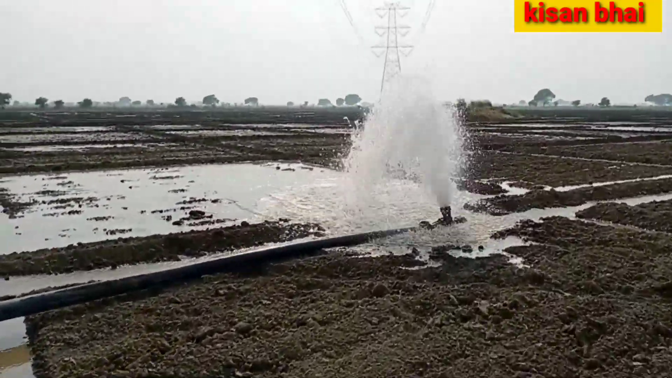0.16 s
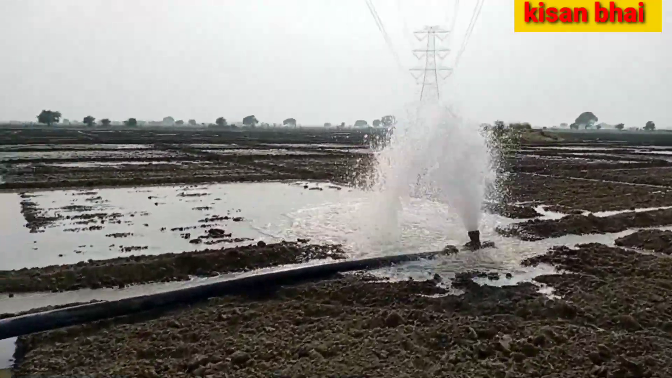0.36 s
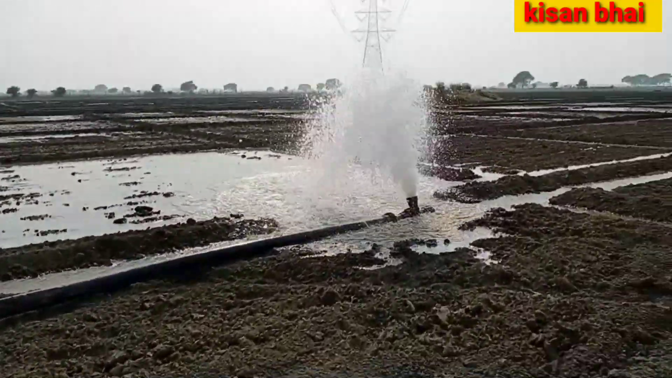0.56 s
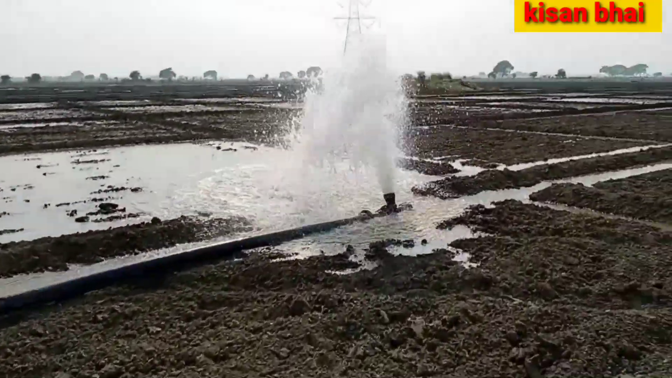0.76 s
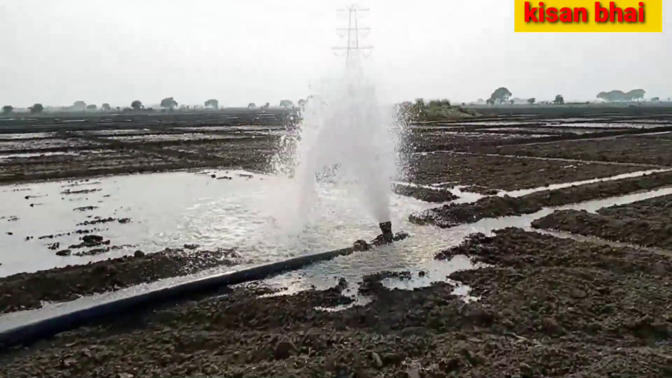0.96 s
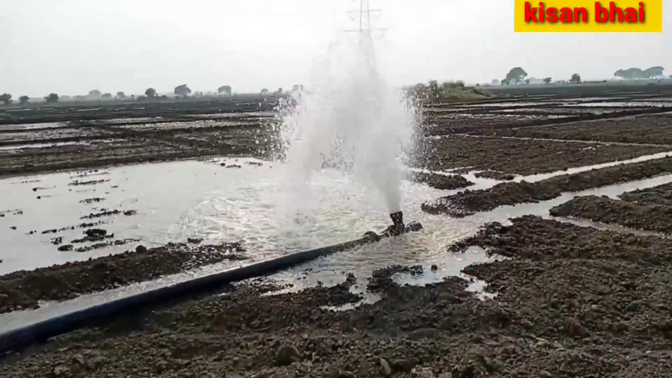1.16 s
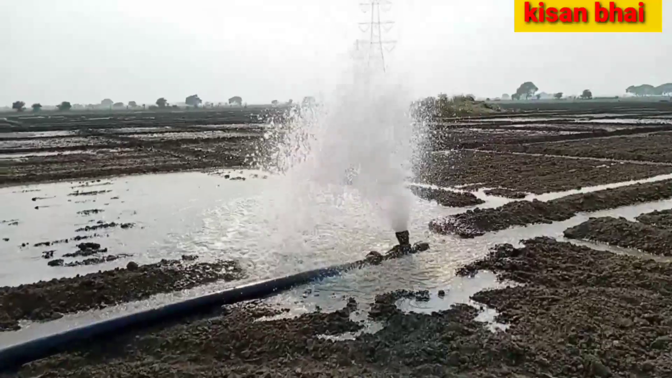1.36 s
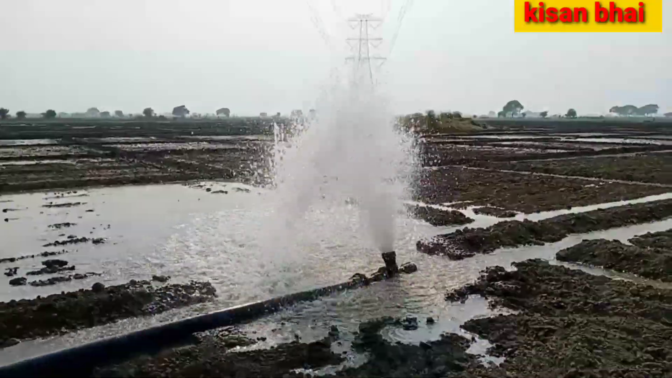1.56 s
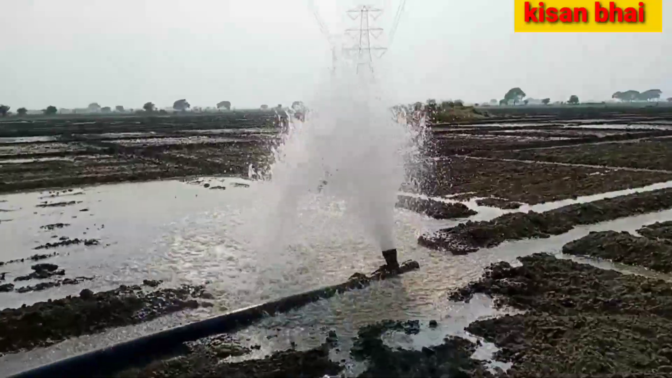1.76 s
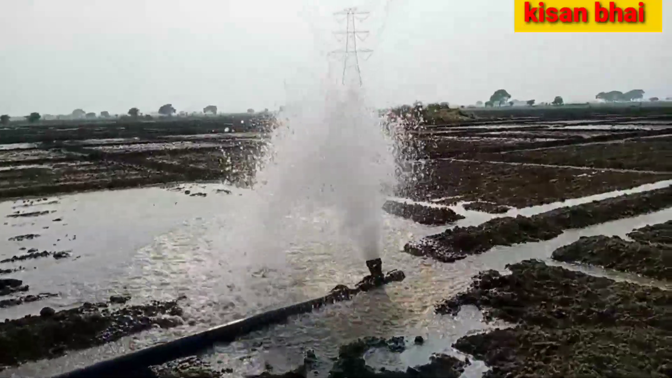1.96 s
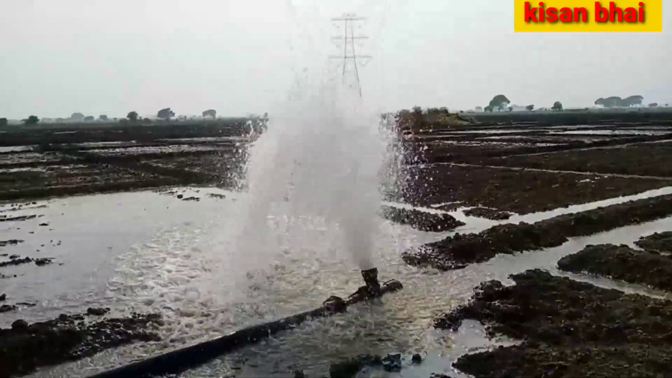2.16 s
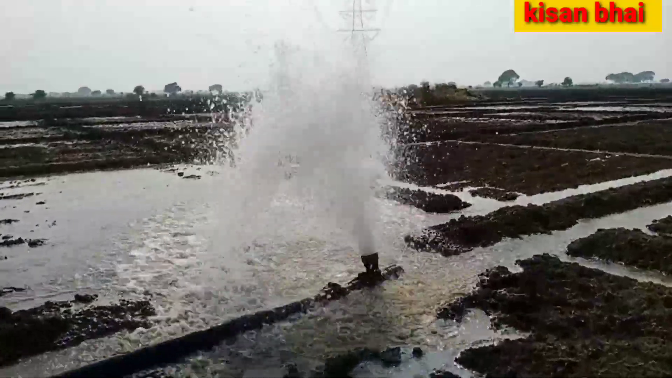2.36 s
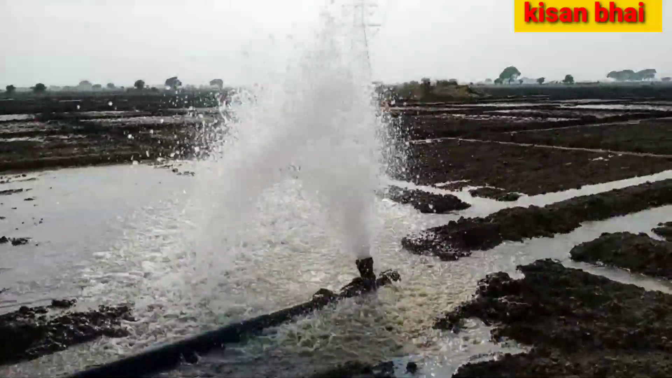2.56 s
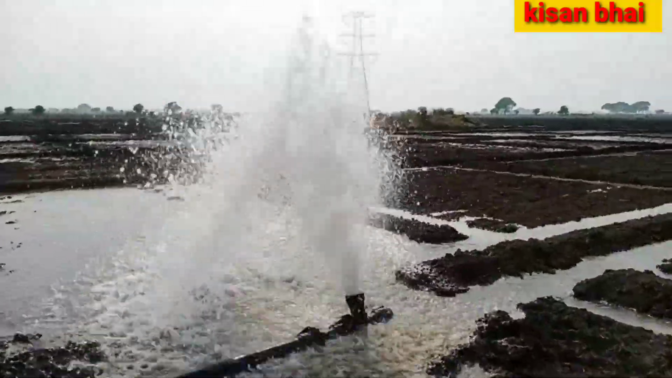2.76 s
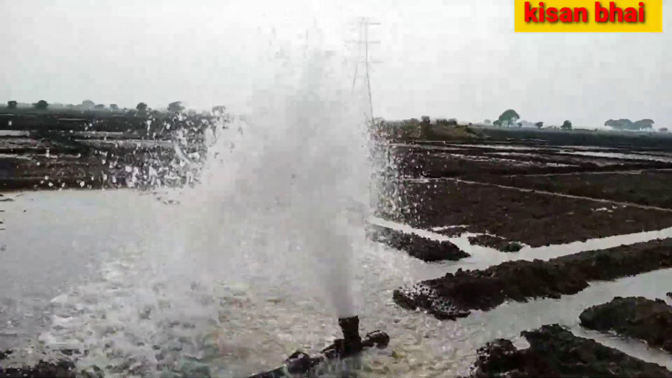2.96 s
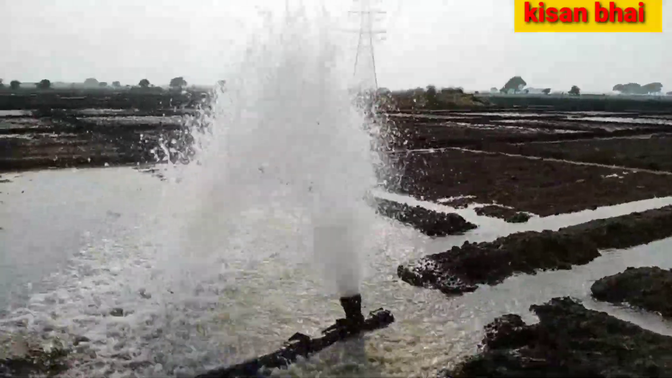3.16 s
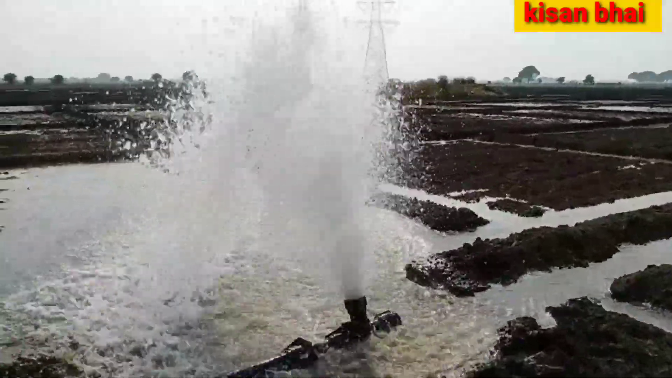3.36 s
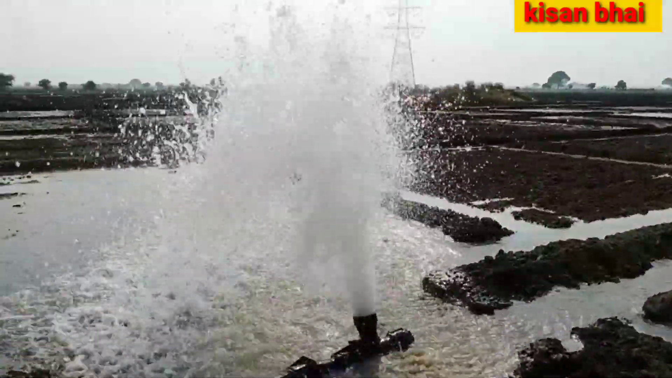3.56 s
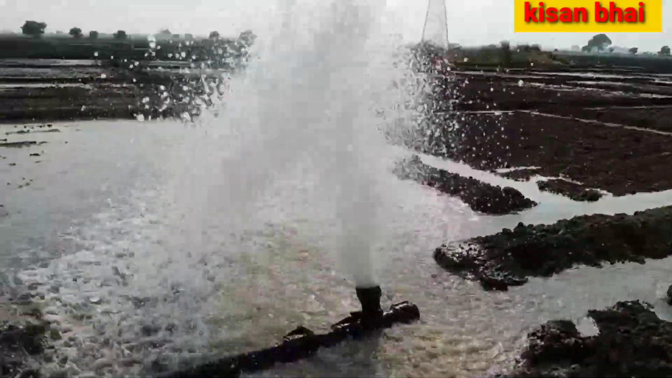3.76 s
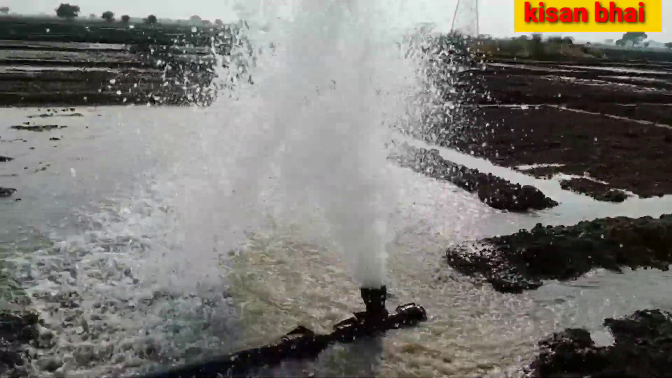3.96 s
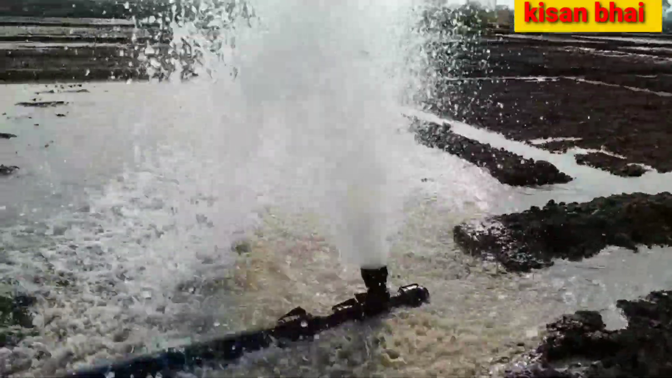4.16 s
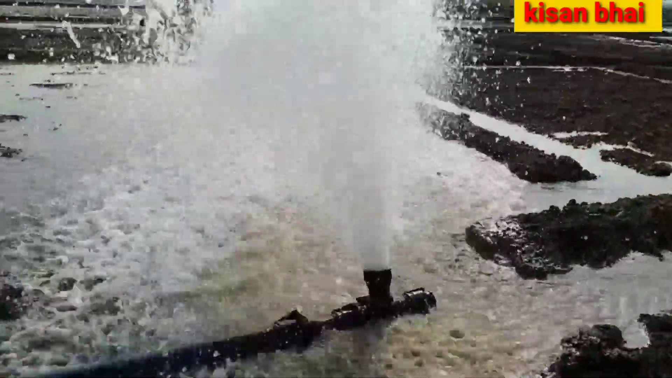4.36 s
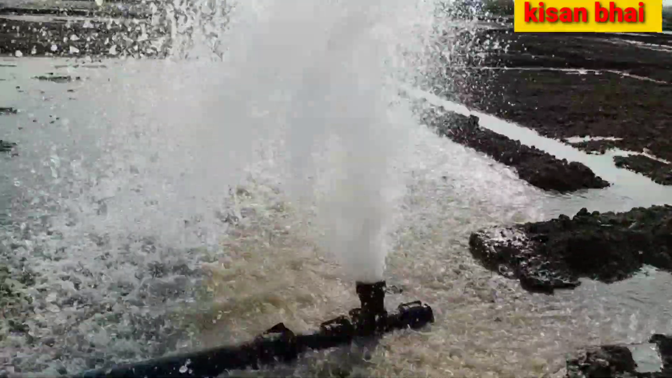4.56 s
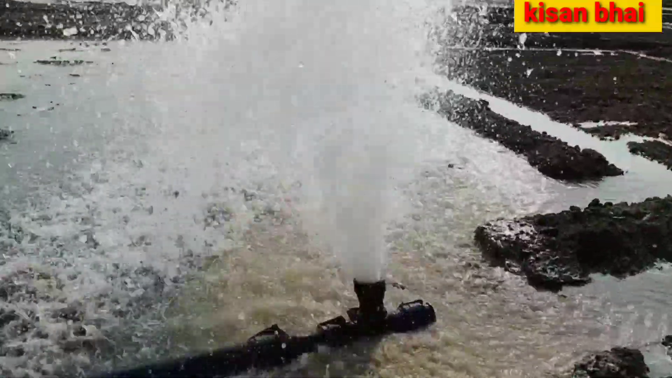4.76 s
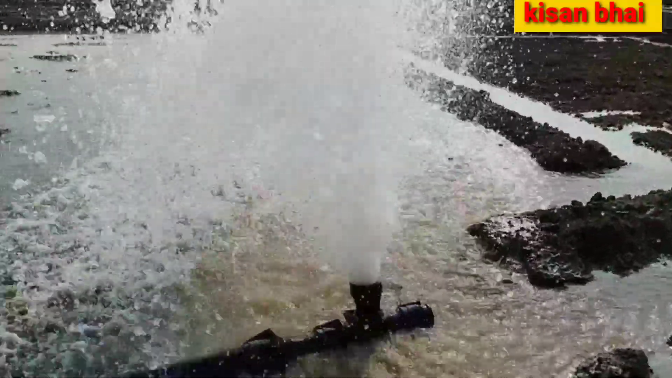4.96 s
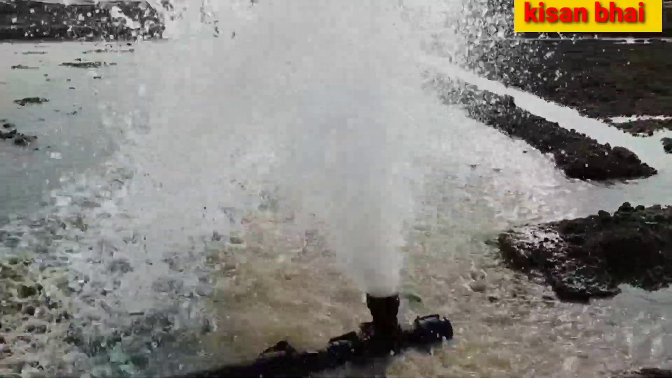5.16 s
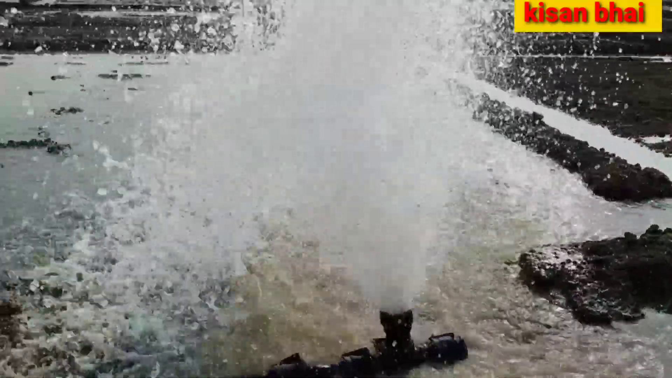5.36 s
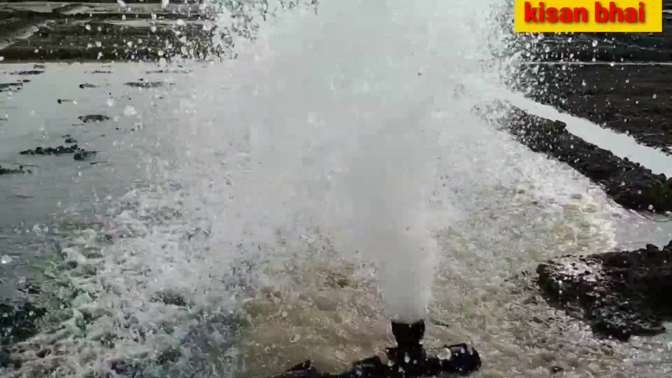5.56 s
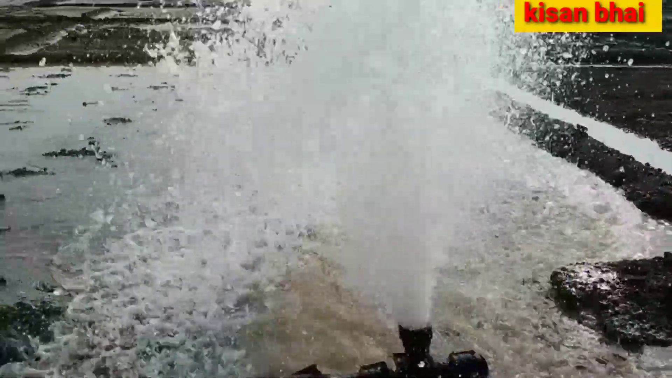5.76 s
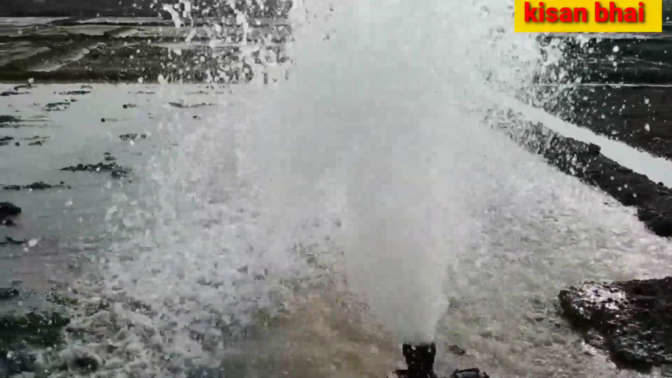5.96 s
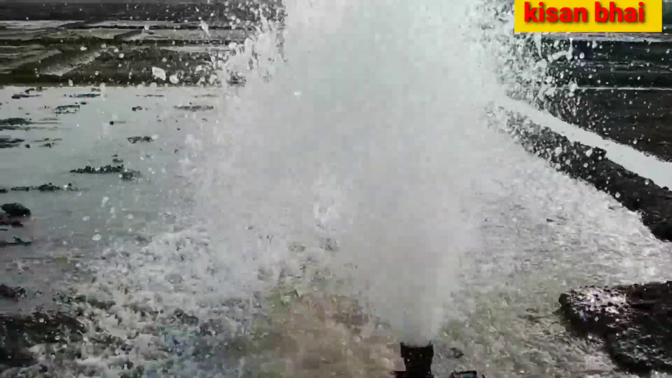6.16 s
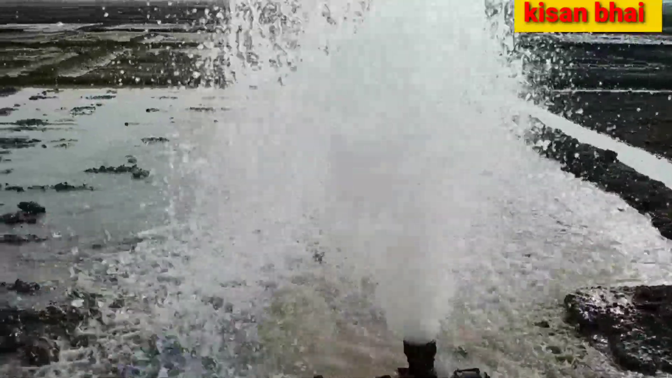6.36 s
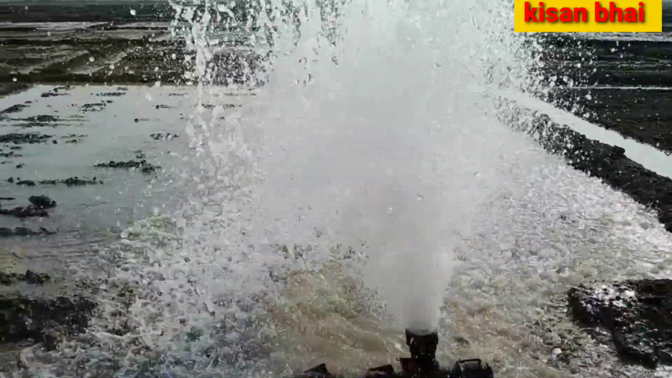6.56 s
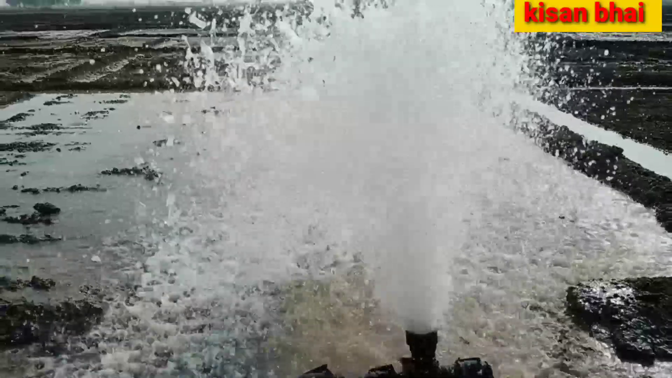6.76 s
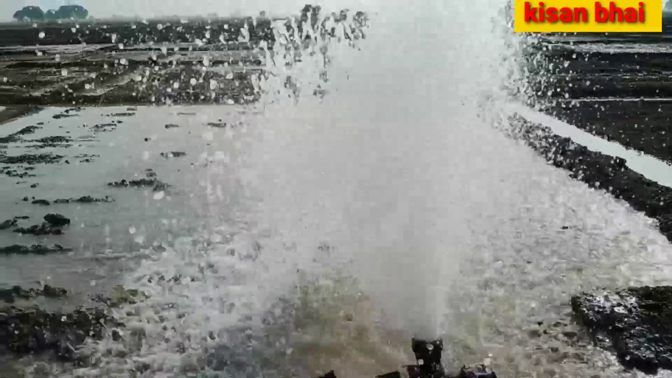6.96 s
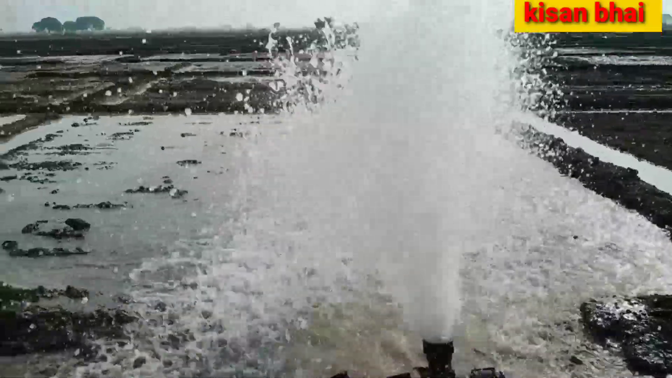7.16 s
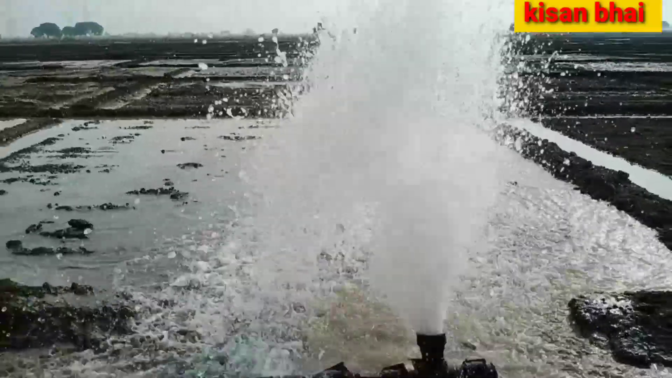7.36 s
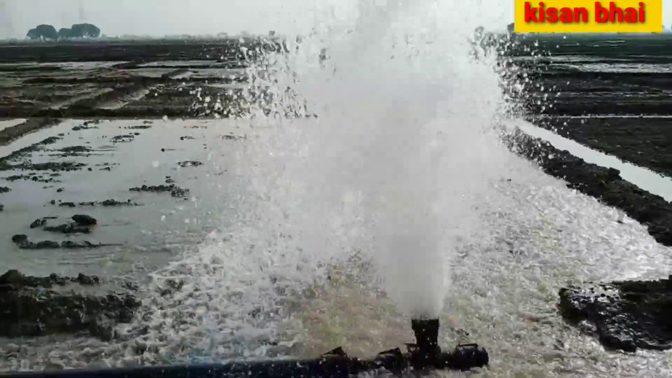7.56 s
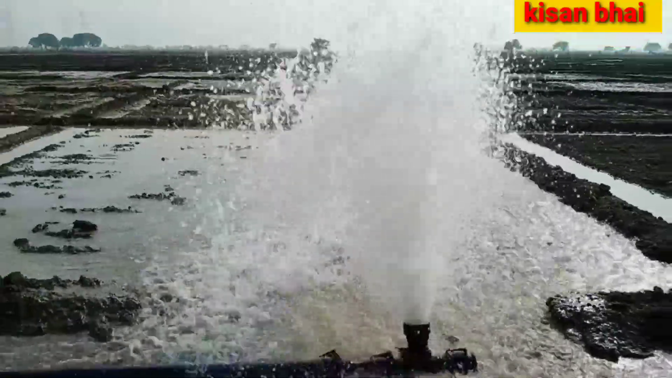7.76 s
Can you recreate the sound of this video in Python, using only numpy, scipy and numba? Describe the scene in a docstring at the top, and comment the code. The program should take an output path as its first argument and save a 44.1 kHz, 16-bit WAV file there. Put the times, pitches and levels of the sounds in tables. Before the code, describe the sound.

A water jet crashes hissing into a flooded field, growing closer, while wind thuds and flutters hard against the phone microphone.

```python
"""Water fizzes and plops: a jet from an irrigation pipe falls into a flooded field as a phone comes nearer.
The splash is hiss plus countless ringing bubbles, and its colour shifts on the way in.
Wind thuds and flutters on the microphone: filtered noise plus short single swings for buffets, soft and hard.
A faint steady rumble lies below, and the phone's limiter pushes the spray down under strong gusts."""
import sys
import numpy as np
from scipy import signal
from scipy.fft import rfft, irfft
from scipy.io import wavfile
from scipy.ndimage import uniform_filter1d, map_coordinates
from numba import njit

SR = 44100
rng = np.random.default_rng(int(sys.argv[2]) if len(sys.argv) > 2 else 0)


def inscribe(sig):
    """Save sig as 16-bit PCM at rate SR to the path in sys.argv[1].

    A 1-D sig is mono; a 2-D sig holds one channel per row.
    Samples are clipped to [-1, 1] before scaling.
    """
    pcm = np.round(np.clip(np.atleast_2d(sig).T, -1, 1) * 32767)
    wavfile.write(sys.argv[1], SR, pcm.astype(np.int16))


N = 343980  # length in samples
HZ = np.maximum(np.arange(N // 2 + 1) * SR / N, 1)  # every frequency in the spectrum

# the walk towards the jet: start_s, nearness (0 far, 1 halfway, 2 nearby, 3 close),
# spray_level_db (before the limiter), mist_lift_db (extra level of the fine mist, full above 8.5 kHz)
APPROACH = [(0, 0.12, -23.5, 1.1), (1.0, 0.075, -22, 2.5), (1.27, 0.22, -23, 1.5), (1.34, 0.2, -19.5, 2.3),
            (1.95, 0.26, -19, 1.6), (2.05, 0.42, -17.5, 1.2), (3, 1.18, -17, 2.1), (3.6, 1.4, -16.5, 2.4),
            (4.3, 2.23, -17, 3.1), (4.6, 2.26, -16, 3), (5, 2.34, -16, 1.9), (5.4, 2.58, -15, 2),
            (5.8, 2.7, -15, 2.4), (6.3, 2.8, -16, 2.3), (6.75, 3, -15.5, 2.1), (6.9, 2.8, -15.5, 1.7),
            (7.3, 2.8, -16, 1.5), (7.45, 2.7, -15.5, 2), (7.8, 2.7, -17.5, 1.8)]


def spray():
    """The splash grows and changes colour on the way in, with reflections and single big drops."""
    near, level_db, mist_lift_db = curves(APPROACH)
    splash = splash_colour(churn(), near)
    splash = splash + ground_echo(splash)
    splash = splash + hand_reflection(splash)
    mist = colour(splash, np.clip(HZ / 1000 - 7.5, 0, 1))
    splash = splash + (undb(mist_lift_db) - 1) * mist
    return undb(level_db) * splash + big_drops()


# colour of the splash at four distances: pitch_hz, level_db (per Hz, relative)
FAR_COLOUR = [(180, -41), (260, -22), (420, -11), (510, -22.5), (620, -1.5), (850, 4), (1150, -3),
              (2200, 1.5), (3000, -1.5), (3450, -7), (4200, -0.5), (7500, -5.5), (9800, -9), (11000, -17),
              (13000, -10.5), (15300, -16)]
HALFWAY_COLOUR = [(140, -59), (240, -16), (352, -7), (516, -19), (730, -2), (1110, -6.5), (1930, 1),
                  (2180, 2), (3150, -9.5), (4230, -1.5), (5490, -7), (6880, -3.5), (10300, -16),
                  (15300, -14)]
NEARBY_COLOUR = [(240, -33), (400, -42), (495, -29), (747, -7), (1010, -11), (1420, -2.5), (2170, -4.5),
                 (3040, -10), (4250, -3), (6130, -16), (6920, -6.5), (9980, -18), (12700, -23.5),
                 (15300, -21)]
CLOSE_COLOUR = [(210, -25), (350, -9.5), (416, -31.5), (638, -5.5), (918, -7), (1410, 0), (1730, -3.5),
                (2690, 0), (3570, -12.5), (4060, -8.5), (5060, -5), (6830, 0.5), (8390, -16), (15300, -13)]


def splash_colour(water, near):
    """Distance changes which pitches stand out; neighbouring places are blended."""
    near = np.clip(near, 0, 3)
    out = 0
    for place, table in enumerate((FAR_COLOUR, HALFWAY_COLOUR, NEARBY_COLOUR, CLOSE_COLOUR)):
        share = np.maximum(1 - abs(near - place), 0)
        out = out + share * unit(colour(water, undb(across(table))))
    return out


# drop sizes: drops_per_s, lowest_hz, highest_hz, ringing_cycles, size_scatter_db,
# level_db (against the hiss, before the spectrum is evened out)
DROP_KINDS = [(4340, 2460, 16000, 1.2, 3.5, -10.5), (1473, 590, 3470, 9.6, 3, -17),
              (895, 696.5, 8990, 17.2, 3, -10.5)]


def churn():
    """Hiss and drops, evened out, in half-octave bands that surge together and flicker alone."""
    water = rng.standard_normal(N)
    for *kind, level_db in DROP_KINDS:
        water = water + undb(level_db) * drops(*kind)
    spectrum = rfft(water)
    spectrum = spectrum / np.sqrt(uniform_filter1d(abs(spectrum) ** 2, size=2000))
    surge_db = 0.1 * walk(11.0) + 0.49 * walk(30) + 0.5 * walk(90)  # sheets of water land together
    out = 0
    for step in np.arange(15):
        band = np.maximum(1 - abs(2 * np.log2(HZ / 150) - step), 0)
        gurgle_db = 5.1 * (step < 4) * walk(7.1)  # the few big bubbles come and go
        flicker_db = 0.72 * walk(2.48) + 0.61 * walk(14)
        out = out + irfft(spectrum * band, N) * undb(surge_db + gurgle_db + flicker_db)
    return out


def drops(rate, lo_hz, hi_hz, cycles, scatter_db):
    """Drops at random moments, some bigger than the rest; tilted to an even spectrum."""
    when, pitch, chance = rng.random((int(rate * N / SR), 3)).T
    hz = lo_hz * (hi_hz / lo_hz) ** pitch
    spread = np.minimum(-np.log(1 - chance), 4)  # surface tension caps the size
    size = undb(scatter_db * spread) * hz / hi_hz
    return unit(plops((when * N).astype(np.int64), hz, 1. * cycles, size, 0.092, N))


# single big drops close by: start_s, level_db (before the limiter), pitch_hz
BIG_DROPS = [(0.122, -24, 350), (0.607, -9, 2300), (2.709, -1, 6350), (2.729, 1, 6730), (2.759, -19, 1920),
             (2.8389, -3, 1830), (3.0394, -17, 2090), (3.2884, -7, 2670), (5.925, -13, 1570)]


def big_drops():
    """Each big drop is a bubble that rings for a few cycles while its pitch rises."""
    start_s, level_db, hz = np.transpose(BIG_DROPS)
    return plops((start_s * SR).astype(np.int64), hz, 5.1, undb(level_db), 0.23, N)


@njit
def plops(start, hz, cycles, size, glide, length):
    """Short fading rings, like air bubbles trapped by drops; the pitch glides up, or down if negative."""
    out = np.zeros(length)
    for k in range(len(start)):
        span = cycles * SR / hz[k]
        phase, gain, fade = 0., size[k], np.exp(-3 / span)
        for i in range(start[k], min(length, start[k] + int(2 * span))):
            phase += 2 * np.pi * hz[k] * (1 + glide * (i - start[k]) / span) / SR
            out[i] += gain * np.sin(phase)
            gain *= fade
    return out


# reflection off the wet ground while the jet is far: start_s, delay_ms, strength (0 to 1)
GROUND_ECHO = [(0, 1.3, 0.3), (.3, 1.15, 0), (.6, 1.1, 0.2), (.75, 0.99, 0.3), (1.3, 1.52, 0.2),
               (2.3, 1.2, 0), (7.8, 1.2, 0)]


def ground_echo(splash):
    """Hiss around 6 kHz arrives a second time, a moment late."""
    delay_ms, strength = curves(GROUND_ECHO)
    hiss = colour(splash, np.exp(-((HZ - 6000) / 2500) ** 2))
    return strength * later(hiss, delay_ms / 1000)


# the hand behind the phone: start_s, hollow_hz (first weakened pitch), strength (0 to 1)
HAND_REFLECTION = [(0, 3430, 0.25), (.35, 3680, 0.17), (.6, 3400, 0.2), (2.2, 3320, 0.17), (4.5, 3240, 0.4),
                   (5.25, 3300, 0.18), (5.6, 3520, 0.13), (7, 3820, 0.14), (7.8, 3600, 0.09)]


def hand_reflection(splash):
    """A copy half a period late partly cancels its pitch and hollows the sound."""
    hollow_hz, strength = curves(HAND_REFLECTION)
    return strength * later(splash, .5 / hollow_hz)


# single buffets, soft to hard: start_s, level_db (reference for all parts of the buffet), pitch_hz,
# sharpness_db (upper part against level_db); each part adds its own offset below
BUFFETS = [(0.066, -21.5, 110, -23), (0.175, -27, 116, -17), (0.233, -31, 96, -20), (0.409, -24, 107, -23),
           (0.468, -32, 137, -14), (0.546, -27, 104, -22), (0.722, -22.5, 102, -18), (0.913, -18, 118, -21),
           (1.003, -15, 117, -20), (1.04, -20, 125, -7), (1.08, -16, 93, -26), (1.124, -13, 95, -25),
           (1.295, -19.5, 97, -22), (1.39, -27, 96, -19), (1.562, -22, 116, -17), (1.605, -24, 96, -19),
           (1.78, -10.5, 131, -18), (1.844, -18.5, 95, -13), (1.884, -16, 135, -20),
           (1.968, -15.5, 92, -17), (2.131, -28, 88.5, -18), (2.307, -23.5, 105, -16),
           (2.364, -31, 108, -10), (2.448, -21, 101, -28), (2.511, -22, 111, -27), (2.553, -20, 100, -23),
           (2.671, -26, 110, -18), (2.736, -22, 112, -16), (2.811, -25, 99, -16), (2.987, -29, 97, -12),
           (3.089, -20, 107, -11), (3.346, -24.5, 130, -15), (3.545, -24, 124, -12), (3.615, -17, 125, -15),
           (3.798, -5, 158, -19), (3.843, -17, 116, -12), (3.898, -9, 114, -25), (3.941, -16, 121, -15),
           (3.973, -7, 123, -22), (4.017, -17, 151, -19), (4.044, -12.5, 126, -12),
           (4.111, -20.5, 142, -16), (4.145, -23, 122, -17), (4.245, -15, 114, -16),
           (4.335, -15.5, 119, -7.5), (4.375, -10, 141, -21), (4.415, -1.5, 141, -23),
           (4.463, -8, 130, -20), (4.498, -9, 162, -11), (4.572, -4, 146, -15), (4.628, -4, 115, -6.5),
           (4.661, -10, 104, -15), (4.751, -12, 112, -6), (4.822, -20, 120, -18), (4.859, -16, 135, -17),
           (4.883, -11, 120, -23), (4.992, -16, 184, -6), (5.064, -12, 137, -7), (5.089, -10, 128, -22),
           (5.121, -12, 140, -11), (5.156, -5.5, 132, -5), (5.206, -19, 162, -8), (5.257, -14, 139, -13),
           (5.332, -3, 117, -2.5), (5.366, -3, 133, -6), (5.427, -14.5, 102, -10), (5.493, -3.5, 128, -20),
           (5.542, -9, 133, -11), (5.567, -3.5, 157, -14), (5.63, -15, 111, -11), (5.656, -11, 144, -7),
           (5.794, -7, 121, -19), (5.824, -8, 142, -12), (5.85, -5.5, 154, -2.5), (5.932, -8, 192, -4),
           (6.003, -14, 144, -8), (6.189, -10, 158, -6), (6.474, -23.5, 146, -5), (6.554, -21, 95, -13),
           (6.609, -19, 112, -16), (6.65, -16, 151, -11), (6.706, -27, 128, -14), (6.789, -10.5, 121, -9),
           (6.839, -2, 169, -10), (6.885, -2, 141, -10), (6.913, -1, 148, -6.5), (6.96, -1, 153, -7),
           (6.993, -4, 187, -2), (7.039, 0.5, 136, -13), (7.078, -5.5, 119, -14), (7.136, -8.5, 126, -19),
           (7.186, -4.5, 153, -11), (7.213, -2, 139, -14), (7.246, -5, 146, -10), (7.279, -2, 148, -5.5),
           (7.342, -11, 108, -18), (7.378, -9, 102.1, -23), (7.402, -11.5, 165, -5.5),
           (7.498, -9.5, 120, -11), (7.521, -5.5, 114, -6.5), (7.577, -7, 175, -11),
           (7.604, -5, 131.5, -15), (7.67, -16, 104, -19.5), (7.728, -6, 128, -19), (7.748, -5, 132, -7)]
# wind between the buffets: start_s, thud_level_db, flutter_level_db (both before random swells)
GUSTS = [(0, -28, -53), (0.12, -36, -55), (0.45, -32, -58), (0.65, -36, -64), (1.02, -24.5, -31),
         (1.17, -26, -50), (1.24, -36, -53), (1.33, -27, -59), (1.45, -37, -67), (1.85, -29, -42),
         (2.2, -40, -51), (2.55, -34, -64), (2.85, -41, -51), (3.1, -29, -39), (3.25, -48, -46),
         (3.6, -27, -43), (3.8, -20.5, -24), (4.15, -27, -36), (4.5, -18, -26.5), (4.68, -18, -19.5),
         (4.93, -28, -37), (5.1, -21, -18), (5.45, -20, -18.5), (5.75, -16, -16.5), (6.0, -18, -17),
         (6.1, -36, -50), (6.17, -28, -34), (6.23, -17, -19), (6.39, -44, -48.5), (6.77, -22, -34),
         (6.84, -22, -13), (7.05, -18, -21.5), (7.28, -22, -19), (7.35, -21, -37), (7.55, -16, -17.5),
         (7.69, -28, -31), (7.8, -11, -20)]
RISE_S = .006  # time from a buffet's start to its crest


def wind():
    """Eddies at the microphone port: thud and flutter in uneven bursts, and single buffets, soft to hard."""
    start_s, level_db, hz, sharp_db = np.transpose(BUFFETS)
    thud_db, flutter_db = curves(GUSTS)
    eddies = rng.standard_normal(N)
    low, high = thud(eddies), flutter(eddies)
    hits = buffets(start_s, level_db, hz, sharp_db)
    crest_s = start_s + RISE_S
    low = low * stirred(thud_db + 2.5 * walk(25), crest_s, level_db - 11)
    high = high * stirred(flutter_db + 3 * walk(15), crest_s, level_db + sharp_db - 2)
    return low + high + hits


def buffets(start_s, level_db, hz, sharp_db):
    """A push or pull of the membrane, a smaller swing on either side, and an abrupt start."""
    push = undb(level_db) * np.sign(rng.random((len(start_s), 1))[:, 0] - .5)
    bodies = swings(start_s + RISE_S, hz, push * undb(3))
    snap_hz, snap_size = hz * 1.76, push * undb(sharp_db + 10.5)
    snaps = plops((start_s * SR).astype(np.int64), snap_hz, 1.2, snap_size, -.1, N)
    return bodies + snaps


def swings(crest_s, hz, size):
    """Short low swings that swell and fade around their crest."""
    reach = 2.68  # cycles on each side of the crest
    out = np.zeros(N + SR)
    for crest, f, g in zip(crest_s, hz, size):
        half = int(reach * SR / f)
        turns = np.arange(-half, half) * f / SR
        swell = np.exp(-(4 * turns / reach) ** 2 / 2)
        first = max(int(crest * SR) - len(turns) // 2, 0)
        out[first:first + len(turns)] += g * swell * np.cos(2 * np.pi * turns)
    return out[:N]


def stirred(base_db, crest_s, level_db):
    """Each buffet stirs the air around it: a short swell in level, added in power to the base."""
    power = np.zeros(N)
    np.add.at(power, (crest_s * SR).astype(int), undb(level_db) ** 2)
    swell = np.hanning(int(0.088 * SR))  # 88 ms from end to end
    extra = signal.fftconvolve(power, swell ** 2, "same")
    return np.sqrt(undb(base_db) ** 2 + np.maximum(extra, 0))


# colour of the low thud: pitch_hz, level_db (per Hz, relative)
THUD_COLOUR = [(15, -45), (35, -21), (50, -16), (65, -2.5), (90, 4), (130, -1.5), (165, -10), (200, -45),
               (300, -85)]


def thud(eddies):
    """The deep part of the eddies, evened out before the gusts shape it."""
    return steady(colour(eddies, undb(across(THUD_COLOUR))), 0.057)


# colour of the higher flutter: pitch_hz, level_db (per Hz, relative)
FLUTTER_COLOUR = [(110, -34), (160, -2), (200, -1.5), (260, -6.5), (350, -12), (500, -19.5), (800, -25),
                  (1500, -60)]


def flutter(eddies):
    """The same eddies with a fast random swell, filtered higher and evened out."""
    uneven = eddies * undb(4.5 * walk(70))
    return steady(colour(uneven, undb(across(FLUTTER_COLOUR))), 0.048)


# colour of the steady low rumble: pitch_hz, level_db (per Hz, relative)
RUMBLE_COLOUR = [(15, -20), (28, -8), (45, -7), (70, -5), (110, 4), (160, -54)]


def rumble():
    """Steady noise kept to the low pitches, faint in the background."""
    return undb(-33.5) * unit(colour(rng.standard_normal(N), undb(across(RUMBLE_COLOUR))))


def undb(db):
    """Decibels to gain."""
    return 10 ** (np.asarray(db) / 20)


def unit(x):
    """Scaled to rms 1."""
    return x / np.sqrt(np.mean(x ** 2))


def curves(table):
    """Each column joined by straight lines in time."""
    s, *columns = np.transpose(table)
    return [np.interp(np.arange(N) / SR, s, c) for c in columns]


def across(table):
    """A (pitch_hz, value) table read at every frequency."""
    hz, value = np.transpose(table)
    return np.interp(np.log(HZ), np.log(hz), value)


def colour(x, gain):
    """Filter by a gain for every frequency."""
    return irfft(rfft(x) * gain, N)


def walk(rate):
    """Random levels, `rate` new ones a second, smoothed twice and scaled to rms 1."""
    k = int(SR / rate)
    held = np.repeat(rng.standard_normal(N // k + 1), k)
    return unit(uniform_filter1d(uniform_filter1d(held, k), k)[:N])


def steady(x, seconds):
    """Level evened out over a short span, so that only quick roughness stays."""
    power = uniform_filter1d(x ** 2, int(seconds * SR))
    return x / np.sqrt(power + 1e-3 * np.mean(x ** 2))


def later(x, seconds):
    """The sound read a changing time late."""
    return map_coordinates(x, [np.arange(N) - seconds * SR], order=3)


def scene():
    """Spray, wind and a faint steady rumble at one microphone."""
    background = rumble()
    return np.tile(spray() + wind() + background, (2, 1))


@njit
def limiter(x, top, ratio, attack, release):
    """Gain that follows the peaks: quickly down above the threshold, slowly back up."""
    gain, e = np.ones(len(x)), 0.
    for i in range(len(x)):
        e += (abs(x[i]) - e) * (attack if abs(x[i]) > e else release)  # share of the gap per sample
        if e > top:
            gain[i] = (top / e) ** (1 - 1 / ratio)
    return gain


# level balance of the two channels: pitch_hz, left_minus_right_db
CHANNEL_BALANCE = [(100, 3.1), (350, 4.4), (750, 4.7), (1150, 7.5), (1450, 7.1), (1850, 4.5), (5600, 4.4),
                   (5800, 1.2), (6700, -1.2), (8300, -10.9), (9300, -16.3), (10800, -9.7), (11400, -11.8),
                   (12600, -4.5), (14000, -1.1), (15400, -0.7)]
# how far the left follows the right: pitch_hz, correlation (0 to 1)
CHANNEL_LIKENESS = [(6400, 1.0), (7500, 0.88), (8400, 0.76), (9300, 0.43), (11300, 0.48), (12200, 0.71),
                    (13600, 0.76), (14300, 0.93), (15300, 0.95)]


def two_channels(mono):
    """One microphone spread over two channels, with balance and likeness set for each pitch."""
    ratio = undb(across(CHANNEL_BALANCE))
    alike = np.clip(across(CHANNEL_LIKENESS), 0, 1)
    right = rfft(mono) * 2 / np.sqrt(1 + ratio ** 2 + 2 * ratio * alike)
    # scrambled phases make the partly unrelated hiss in the left, with the same colour
    apart = np.sqrt(1 - alike ** 2)
    scramble = np.exp(2j * np.pi * walk(200)[:len(HZ)])  # here the random walk runs along frequency
    unrelated = irfft(right * ratio * apart * scramble, N)
    return np.array([irfft(right * ratio * alike, N) + unrelated, irfft(right, N)])


def record(dry):
    """Cut the deepest bass, duck under the flutter, limit, spread to two channels, clip, cut the top."""
    mono = signal.sosfilt(signal.butter(3, 50.5, "high", fs=SR, output="sos"), dry[0])
    # the first gain control listens only to the middle bass, mostly flutter
    heard = signal.sosfilt(signal.butter(2, [150, 520], "band", fs=SR, output="sos"), mono)
    mono = mono * limiter(heard, 0.062, 1.247, 0.0055, 0.0012)
    mono = mono * limiter(mono, 0.35, 1.77, 0.0092, 0.00041)
    pair = np.clip(two_channels(mono), -1, 1)
    return signal.sosfilt(signal.ellip(16, .3, 90, 15480, fs=SR, output="sos"), pair)


dry = scene()
out = record(dry)
inscribe(out)
```